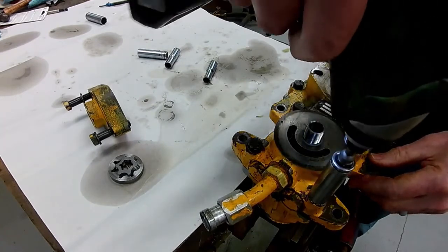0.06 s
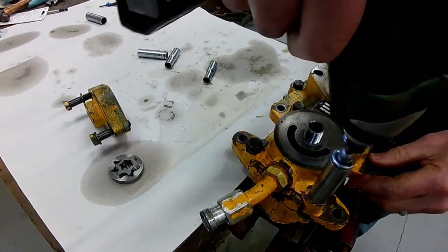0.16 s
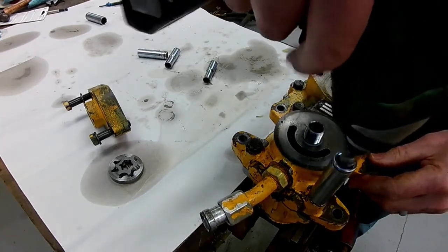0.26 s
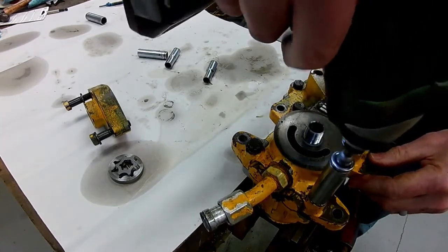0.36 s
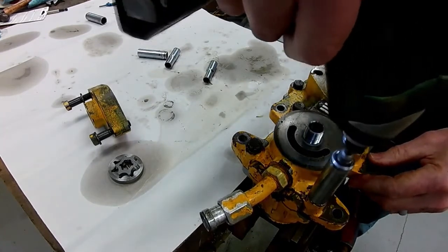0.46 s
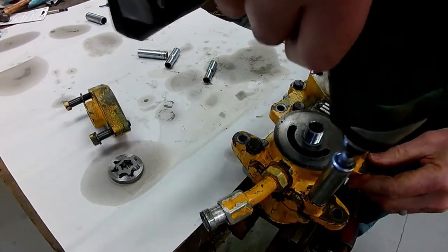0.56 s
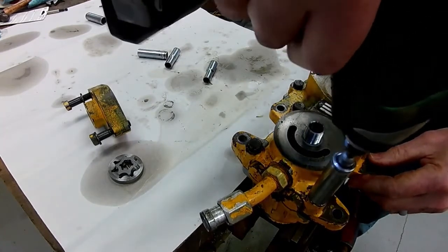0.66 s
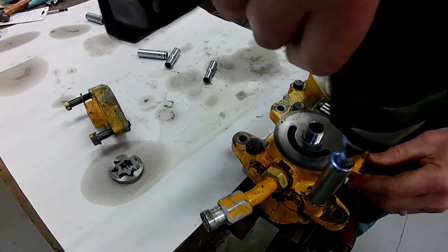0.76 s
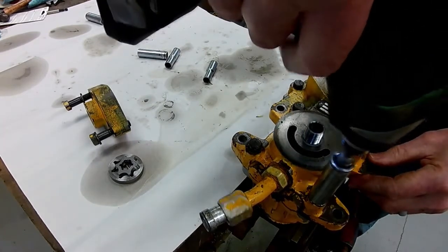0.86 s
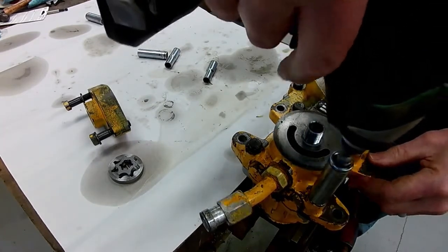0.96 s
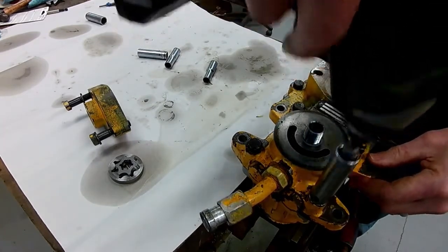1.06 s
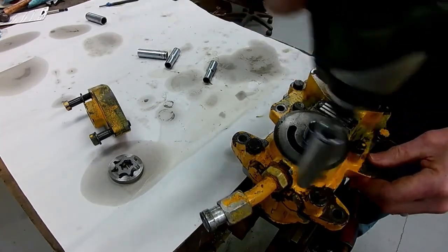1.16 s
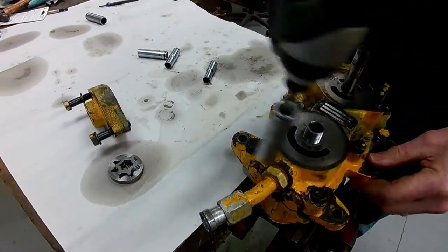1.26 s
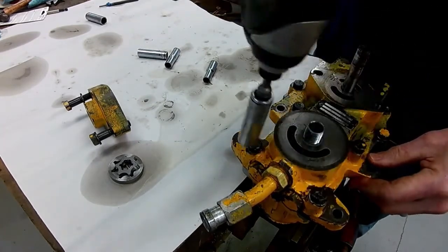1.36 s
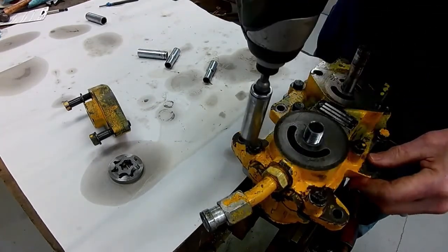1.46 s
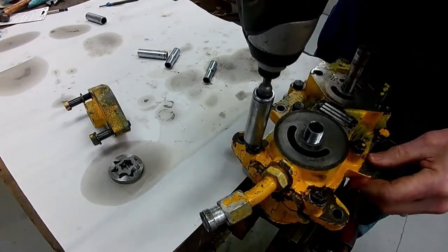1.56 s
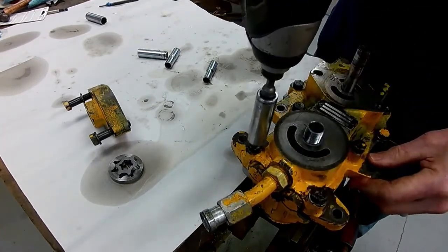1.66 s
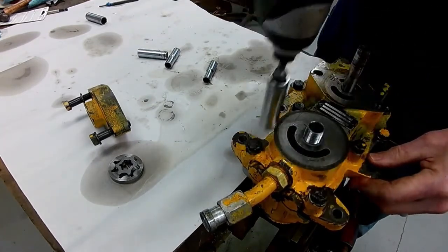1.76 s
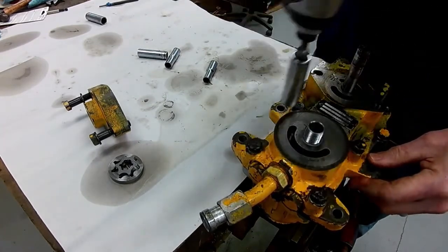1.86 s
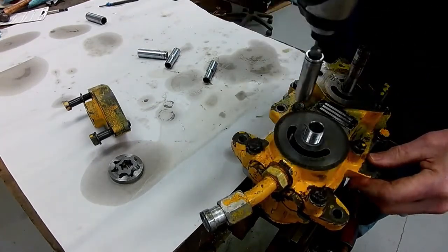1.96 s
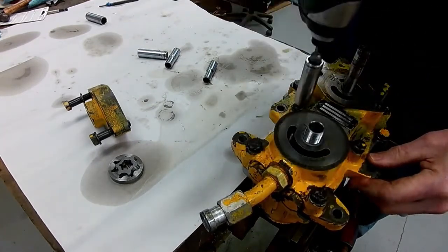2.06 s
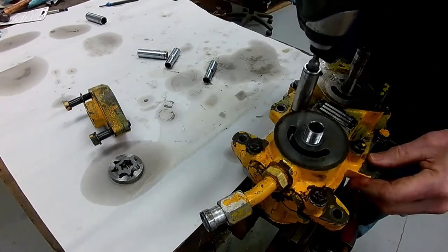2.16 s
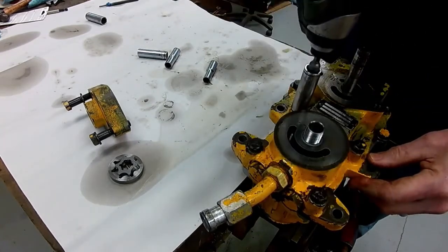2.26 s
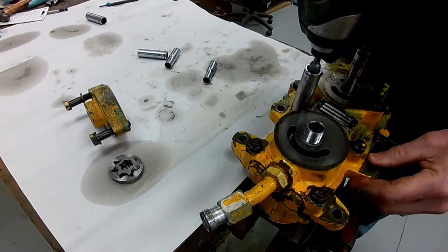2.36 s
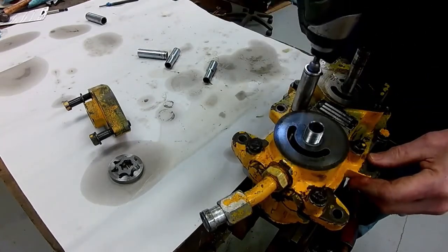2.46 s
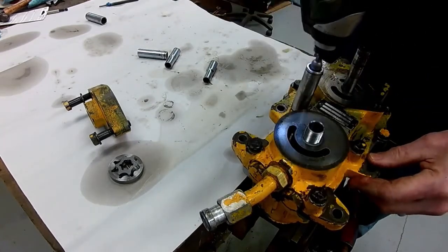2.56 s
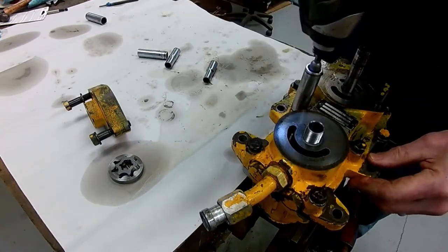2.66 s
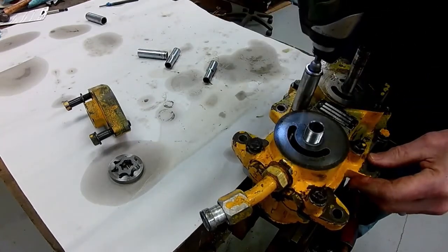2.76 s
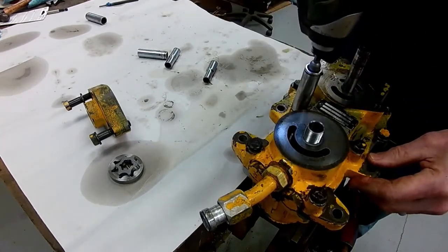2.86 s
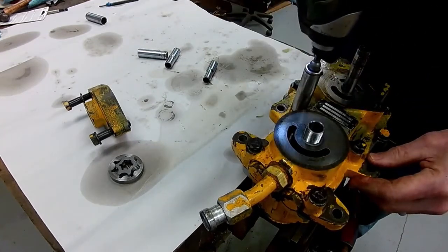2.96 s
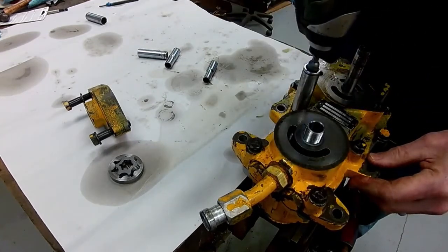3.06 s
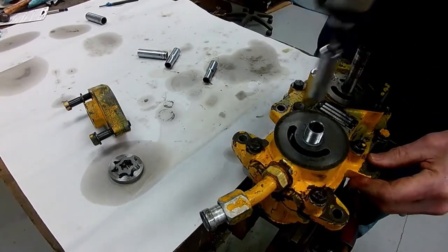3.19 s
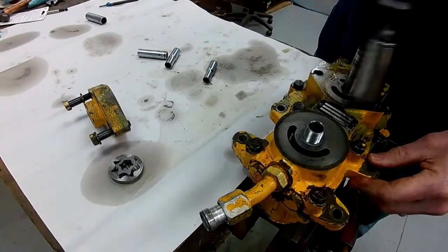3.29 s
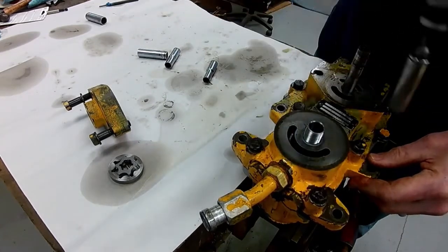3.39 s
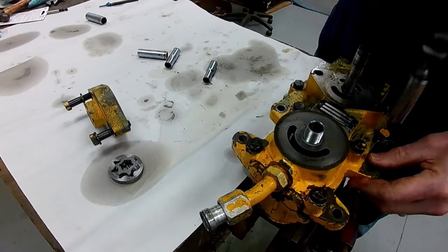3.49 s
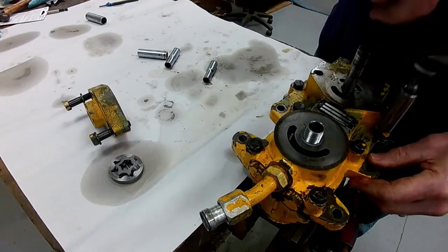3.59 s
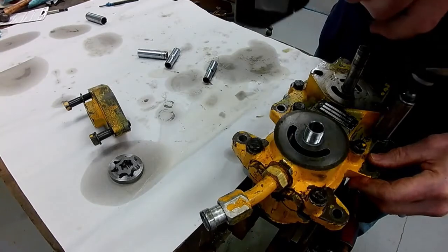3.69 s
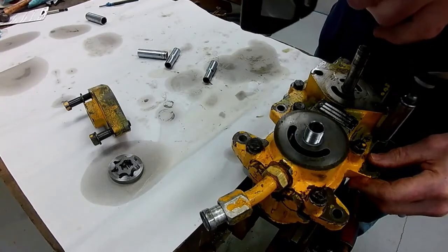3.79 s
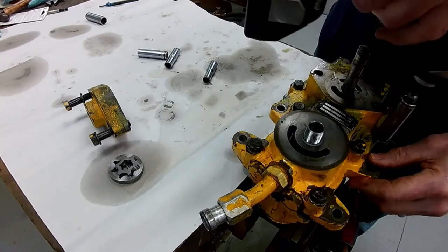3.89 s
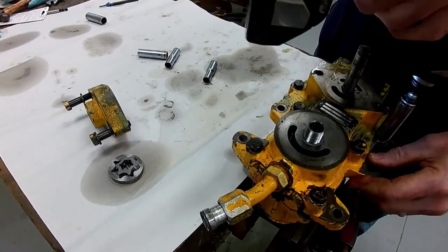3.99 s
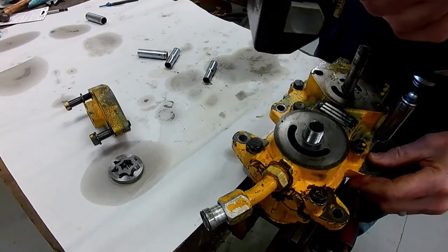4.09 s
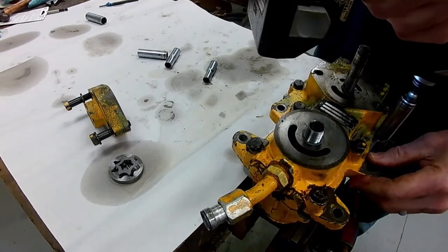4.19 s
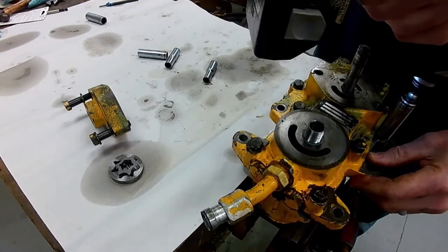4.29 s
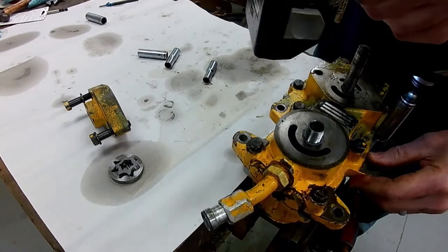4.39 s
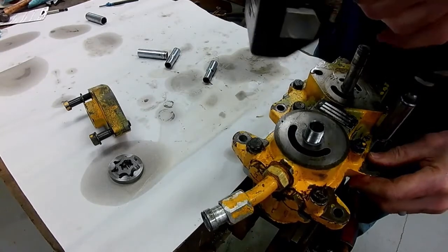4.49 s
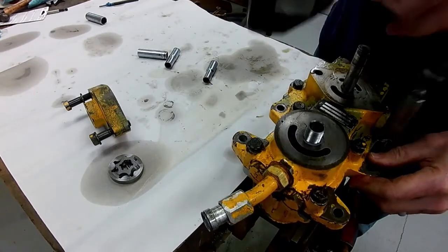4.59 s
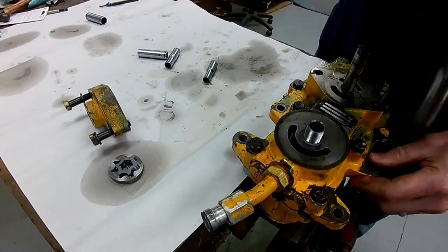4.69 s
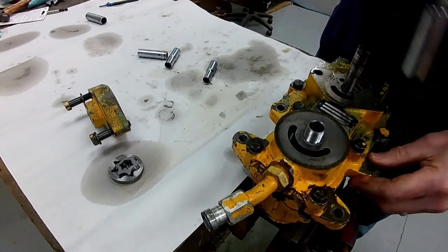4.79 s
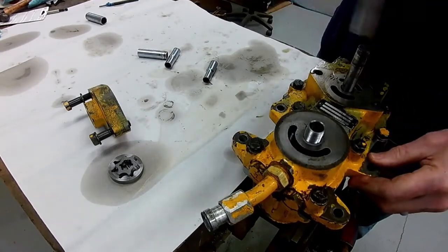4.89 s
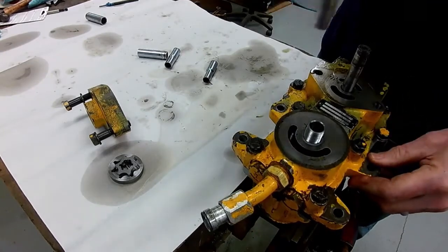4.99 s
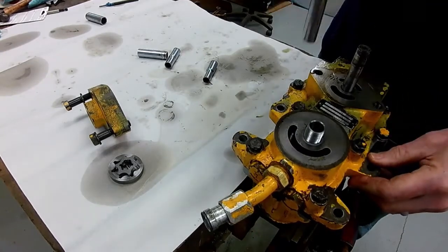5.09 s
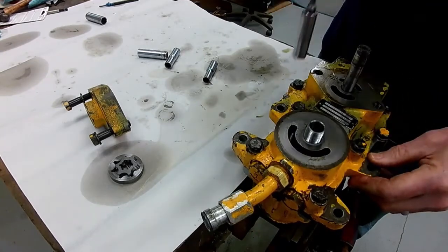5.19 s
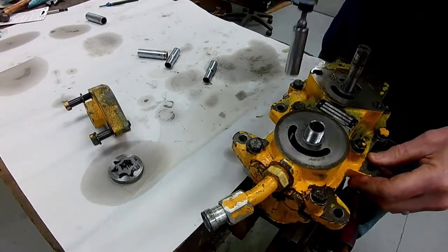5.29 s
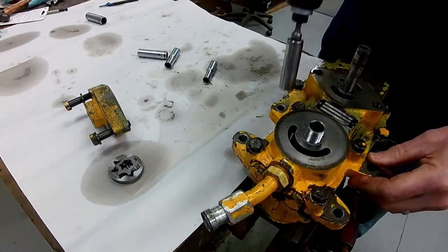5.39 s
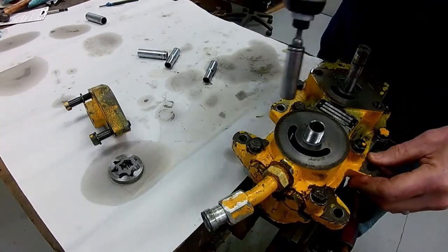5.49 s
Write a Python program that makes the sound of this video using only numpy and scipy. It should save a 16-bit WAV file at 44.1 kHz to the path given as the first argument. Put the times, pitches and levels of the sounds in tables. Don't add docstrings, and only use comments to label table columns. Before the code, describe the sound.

A cordless impact wrench hammers four harsh metallic bursts on a heavy casting, close and overloaded, with faint socket scrapes in between.

```python
import sys
import numpy as np
from scipy import signal
from scipy.fft import rfft, irfft, next_fast_len
from scipy.io import wavfile
from scipy.ndimage import uniform_filter1d

SR = 44100
rng = np.random.default_rng(int(sys.argv[2]) if len(sys.argv) > 2 else 0)


def decibels_to_gain(level_db):
    exponent = np.asarray(level_db, float) / 20
    return 10 ** exponent


def unload_wav(signal):
    wavfile.write(
        sys.argv[1],
        SR,
        np.round(np.clip(np.atleast_2d(signal).T, -1, 1) * 32767).astype(np.int16),
    )


N = 244314


def evened(x):
    return x / np.sqrt(np.mean(x ** 2) + 1e-20)


def read(points, hz):
    f, value = np.transpose(points)
    return np.interp(np.log(hz + 1), np.log(f + 1), value)


def colour(x, points):
    size = next_fast_len(len(x))
    gain = decibels_to_gain(read(points, np.fft.rfftfreq(size, 1 / SR)))
    return irfft(rfft(x, size) * gain, size)[:len(x)]


def resonate(x, hz, width):
    return signal.lfilter(*signal.iirpeak(hz, hz / width, SR), x)


def add(mix, s, sound):
    mix[round(s * SR):][:len(sound)] += sound


# frequency in Hz, density in dB per Hz.
AIR_COLOUR = [(12, -26), (20, -3), (65, 2), (86, -6), (163, -7), (300, -9.5), (341, -9), (441, -14),
              (541, -10), (615, -12), (1230, -14), (1840, -22), (9000, -55), (11700, -89.5), (19800, -120)]
# frequency in Hz, width in Hz, level in dB.
FAN = [(539.8, 43, -62.5), (153.9, 15, -64), (906.6, 37, -66)]


def air():
    wash_db = -52
    frames, hz = N // 256 + 5, np.fft.rfftfreq(1024, 1 / SR)
    a, b, patches = rng.standard_normal((frames, 513, 3)).T
    patches = uniform_filter1d(patches, 8, 0)
    patches = evened(uniform_filter1d(patches, 14, 1))
    z = (a + 1j * b) * decibels_to_gain(read(AIR_COLOUR, hz)[:, None] + 0.5 * patches)
    wash = decibels_to_gain(wash_db) * evened(signal.istft(z, nperseg=1024, noverlap=768)[1][:N])
    hiss = rng.standard_normal(N)
    tones = sum(decibels_to_gain(db) * evened(resonate(resonate(hiss, f, w), f, w)) for f, w, db in FAN)
    return wash + tones


# frequency in Hz, width in Hz, level in dB.
CASTING = [(800, 300, -8), (1050, 260, -2), (1500, 300, -4), (1900, 400, -10)]
# frequency in Hz, gain in dB.
CRACK = [(1500, -49), (2200, 8), (3300, 5), (4300, 3.5), (5500, -2.5), (6500, -19), (8000, -6)]


def strikes(rows, width_hz, skirt_hz, casting_db, crack_db, after_db, after_ms):
    thud_hz, thud_db = 328, -18
    out, t = np.zeros(N + 2048), np.arange(2048) / SR
    chance = rng.standard_normal((len(rows), 2048))
    crack_response = colour(np.eye(1, 128, 24)[0], CRACK)
    swell = 1 - np.exp(-t / 0.0004)
    for (s, db, rattle_ms, hz, share_db), noise in zip(rows, chance):
        chatter = noise * (1 + 6 * np.exp(-t / 0.00024))
        force = np.exp(-(1000 * t / rattle_ms) ** 4)
        shape = np.maximum(force, decibels_to_gain(after_db) * np.exp(-1000 * t / after_ms))

        casting = np.zeros(len(t))
        for k, (f, w, level_db) in enumerate(CASTING):
            casting += (-1) ** k * decibels_to_gain(level_db) * resonate(chatter, f, w)
        ring = resonate(chatter, hz, width_hz) + decibels_to_gain(casting_db) * casting
        ring = resonate(ring, hz, skirt_hz)
        ring /= np.sqrt(uniform_filter1d(ring ** 2, size=90) + 0.039 * np.mean(ring ** 2))

        thud = resonate(chatter * force, thud_hz, 660)
        crack = noise * abs(noise) * shape * np.exp(-t / 0.015)
        crack = signal.fftconvolve(crack, crack_response)[24:2072]
        for part, part_db in [(ring * shape * swell, 0), (thud, thud_db), (crack, share_db + crack_db)]:
            add(out, s, decibels_to_gain(db + part_db) * part / abs(part).max())
    return out[:N]


# first blow in seconds, last blow in seconds, gap in ms, ring in Hz, rattle in ms.
HAMMERING = [
    (0.0721, 0.107, 19.2, 1330, 3.1),
    (0.148, 0.2293, 20.4, 1294, 4.6),
    (0.4283, 0.5572, 21.3, 1174, 5.3),
    (0.579, .7798, 22.2, 1298, 8.5),
    (0.8, 0.8902, 21.7, 1323, 7.1),
    (2.5002, 2.6279, 21.9, 1177, 5.5),
    (2.651, 2.9863, 22.3, 1171, 5),
    (4.0182, 4.1088, 21.8, 1485, 4.1),
    (4.1277, 4.2355, 21.6, 1158, 3.4),
    (4.258, 4.4343, 22.2, 1492, 6.6),
]
# time in seconds, peak in dB, rattle in ms.
SLACK = [(0.5283, 2, 2), (0.5488, 9, 3.7), (0.5956, 11, 4.2), (0.6213, 11, 2.7), (0.6444, 6, 1.2),
         (0.6632, 6, 7), (0.684, 0.5, 2.2), (0.7075, 7.5, 6), (0.7442, 1.5, 5.8), (0.7525, 11, 3.8),
         (0.7952, 5.5, 2.6), (0.84, 11, 2.9), (0.8632, -3, 4), (2.6456, 3.5, 6.6), (2.6689, -2, 5.5),
         (2.7133, 3, 9.7), (2.7579, 4.5, 7.4), (2.802, 4, 9.8), (2.848, 7, 6.5), (2.8687, 6.5, 4.7),
         (2.9135, 9, 2.8), (2.9371, 4, 4.3), (2.9592, 5.5, 6), (2.9748, -6, 8.3), (2.9807, 6.5, 4.3),
         (4.2563, -0.5, 3), (4.3411, 2, 6), (4.428, 2, 4.7)]
# time in seconds, peak in dB, rattle in ms.
STUMBLES = [(0.0616, -7, 2.4), (0.1147, 3.5, 1.6), (0.1239, 10, 3.5), (0.2466, 5, 3.4), (0.2564, 1.5, 6.2),
            (0.4036, 3.5, 4.4), (0.4132, -3.5, 1.8), (.422, 1, 3.9), (0.4819, 1.5, 2.1), (2.465, -5, 1.4),
            (2.4706, 6.5, 2.3), (2.4789, 2.5, 2.5), (4.0121, 3, 1.0), (4.4586, -3.5, 13), (4.4777, 2, 3.5),
            (4.5129, -13.5, 3.6)]


def blows():
    blow_db = 6.5
    even = []
    for first, last, gap_ms, _, rattle_ms in HAMMERING:
        count = round(1000 * (last - first) / gap_ms) + 1
        even += [(s, blow_db, rattle_ms) for s in np.linspace(first, last, count)]

    late, weak = rng.standard_normal((len(even), 2)).T
    rebounds = []
    for (s, _, _), a, b in zip(even, late, weak):
        delay_ms, rebound_db, rebound_rattle_ms = 10.5 + 1.5 * a, -11 + 6.5 * b, 1.5
        rebounds.append((s + delay_ms / 1000, rebound_db, rebound_rattle_ms))

    s, db, rattle_ms = np.transpose(even + rebounds + SLACK + STUMBLES)
    a, b, c, d = np.clip(rng.standard_normal((len(s), 4)).T, -2, 2)
    starts, rings = np.transpose(HAMMERING)[[0, 3]]
    hz = np.interp(s, starts, rings) * np.exp(0.08 * c)
    glancing = np.repeat([0, 1, 0], [len(even), len(rebounds + SLACK), len(STUMBLES)])
    share_db = -10 + 1.54 * d - 3.5 * glancing
    return list(zip(s, db + 0.82 * a, rattle_ms * np.exp(0.2 * b), hz, share_db))


# time in
# seconds, peak in dB, rattle in ms, ring in Hz, crack share in dB.
TRIGGER = [
    (0.0139, -3.5, 2.1, 1307, -35.5),
    (0.0206, -19.5, 1.24, 1194, -27.5),
    (.073, 5, 6.2, 1393, -21.5),
    (0.902, -10, 2.5, 1148, -14),
    (3.009, -6.5, 1.5, 1334, -12),
    (3.023, -15, 1.7, 1305, -27),
    (3.039, -8, 1.5, 1190, -19.5),
    (4.495, 3.5, 0.87, 1354, -12),
    (4.529, -11, 2.1, 1300, -31),
]


def hammer():
    return strikes(blows() + TRIGGER, width_hz=480, skirt_hz=1080, casting_db=-29.5, crack_db=12.5,
                   after_db=-12.0, after_ms=11)


# pull, full speed, release and standstill in seconds, level in dB.
PULLS = [
    (0.045, 0.075, .26, 0.36, -19),
    (.36, .43, 0.9, 0.97, -16.5),
    (2.429, 2.452, 3.005, 3.274, -20.5),
    (3.962, 3.999, 4.53, 4.77, -22),
]
# time in seconds, level in dB.
SCRAPE = [
    [(2.085, -64), (2.1, -53), (2.14, -60.5), (2.165, -64), (2.185, -58), (2.21, -65.5)],
    [(3.655, -62), (3.68, -51.5), (3.7, -62.5), (3.76, -52.5), (3.79, -60), (3.81, -51.5), (3.84, -67)],
]
# frequency in Hz, density in dB per Hz.
WHIRR_COLOUR = [(24, -55.5), (40, -29), (193, -28.5), (263, -13.5), (336, -11), (611, -10.5), (996, 0.5),
                (1770, -11.5), (2310, -11.5), (5130, -21), (8000, -41), (10400, -80), (17600, -120)]


def whirr():
    load_db, still_db = 1.5, -58
    t, level = np.arange(N) / SR, np.zeros(N)
    for *s, db in PULLS:
        level += decibels_to_gain(np.interp(t, s, [still_db, db, db + load_db, still_db], -200, -200))
    for rows in SCRAPE:
        s, db = np.transpose(rows)
        level += decibels_to_gain(np.interp(t, s, db, -200, -200))
    strength = decibels_to_gain(1.5 * rng.exponential(1, N)) * rng.standard_normal(N)
    ticks = strength * (rng.random(N) < 6000 / SR)
    return level * evened(colour(ticks, WHIRR_COLOUR))


# time in seconds, peak in dB, ring in Hz, crack share in dB.
KNOCKS = [(1.0396, -16.5, 1290, -16), (2.088, -35, 1650, -17.5), (2.0974, -30, 1030, -26.5),
          (2.1032, -36.5, 1670, -9.5), (2.1097, -41.5, 990, -29.5), (2.1162, -32, 980, -30.5),
          (2.131, -29, 1510, -24.5), (2.1718, -28, 1010, -29), (2.1823, -36, 1090, -5.5),
          (2.4283, -32, 1090, -6.5), (2.4368, -27, 1240, -3), (3.665, -26.5, 1780, -29),
          (3.6724, -26, 1790, -6.5), (3.6877, -39.5, 1420, -14), (3.709, -35.5, 1410, -22),
          (3.7585, -34, 1030, -10), (3.777, -28.5, 1420, -25), (3.7971, -27.5, 1220, -24),
          (3.8014, -27.5, 1090, -7), (3.8094, -30.5, 880, -13), (3.9759, -24.5, 1410, -8)]
# time in seconds, peak in dB, rattle in ms, ring in Hz, crack share in dB.
THUMPS = [
    (5.5, -51.5, 12, 190, -47),
    (3.816, -45, 10, 200, -40.5),
    (4.1, -39, 10, 200, -45),
    (3.5, -47, 5.3, 240, -49),
]


def knocks():
    touches = [(s, db, 3.2, hz, share_db) for s, db, hz, share_db in KNOCKS]
    return strikes(touches + THUMPS, width_hz=280, skirt_hz=900, casting_db=-16, crack_db=9,
                   after_db=-1.5, after_ms=3.5)


# frequency in Hz, reverberation time in seconds.
SHOP = [(200, 0.3), (530, 0.69), (1390, .62), (3680, 0.69), (7000, 0.46)]
# delay in seconds, level in dB.
ECHOES = [(.004, -19), (.0075, -20), (.011, -16), (.016, -21), (.023, -22), (.031, -23)]


def shop(x):
    tail_db = -15.5
    taps = np.zeros(SR)
    at = np.arange(700, SR - 20, 20)
    taps[at + rng.integers(0, 20, len(at))] = rng.choice([-1., 1.], len(at))
    hz, t, z = signal.stft(taps, SR, nperseg=256)
    decay = decibels_to_gain(-60 * t / read(SHOP, hz)[:, None])
    tail = signal.istft(z * decay, SR, nperseg=256)[1]
    tail *= decibels_to_gain(tail_db) / np.linalg.norm(tail)
    for k, (s, db) in enumerate(ECHOES):
        tail[round(s * SR)] += (-1) ** k * decibels_to_gain(db)
    return signal.fftconvolve(x, tail)[:N]


def scene():
    tool = decibels_to_gain(-0.5) * hammer() + knocks() + whirr()
    return (tool + shop(tool) + air())[None]


# frequency in Hz, gain in dB.
MIC = [(20, -3), (100, 4.5), (500, 4), (4500, -3.5), (5800, -3), (6600, -6), (7500, -26), (9000, -64.5),
       (15000, -83.5)]


def microphone(x):
    knee, ceiling = 5.5, 0.88
    clipped = x / (1 + abs(x / ceiling) ** knee) ** (1 / knee)
    return colour(clipped, MIC)


# time in seconds, one band in Hz, other band in Hz,
# gain elsewhere in dB.
STARVED = [(.143, 4530, 2299, -12), (.305, 4316, 2695, -38), (.548, 3387, 2152, -8), (1.225, 3650, 4250, 0),
           (2.27, 3370, 2520, -14.5), (2.83, 2970, 4024, -8.5), (3.085, 2650, 2100, -9),
           (3.77, 5000, 2430, -16), (4.11, 3088, 6366, -6.5), (4.153, 2993, 2290, -15.5),
           (4.215, 5160, 3125, -0.5), (4.285, 5150, 3125, -10), (4.35, 5186, 2800, -9),
           (4.405, 4920, 3220, -6), (4.435, 2820, 3257, -12.5), (4.55, 3500, 2400, -22),
           (5.37, 2190, 1300, -21.5)]
# frequency in Hz, gain in dB.
SPECKS = [(5000, -45), (6200, 1), (7500, -2.5), (9000, -8.5), (12000, -12.5), (15500, -18), (15800, -60)]


def patchy_treble(x):
    kept_hz, kept_db = 199.6, 9.5
    specks_db, quiet_db = -32, -104
    hz, t, z = signal.stft(x, SR, nperseg=1024, noverlap=768)
    turn = np.exp(2j * np.pi * rng.random(z.shape[::-1]).T)
    held = np.repeat(turn[:, ::6], 6, 1)[:, :len(t)]
    steady = held * np.exp(2j * np.pi * hz[:, None] * t)

    for s, low_hz, high_hz, loss_db in STARVED:
        frames = abs(t - s) < 0.014
        kept = (abs(hz - low_hz) < kept_hz) | (abs(hz - high_hz) < kept_hz)
        gain = np.where(kept, decibels_to_gain(kept_db), decibels_to_gain(loss_db))
        smear = abs(z[:, frames]).mean(1, keepdims=True) * steady[:, frames] * gain[:, None]
        z[:, frames] = np.where(hz[:, None] > 1900, smear, z[:, frames])

    loudness = np.sqrt(uniform_filter1d((abs(z) ** 2).sum(0), size=6)) ** 1.69
    lines, bands = rng.random((len(t) // 6 + 1, len(hz), 2)).T
    survive = (lines < 0.27) & (bands[np.arange(len(hz)) // 4] < 0.78)
    survive = np.repeat(survive, 6, 1)[:, :len(t)]
    z += decibels_to_gain(specks_db - 2.5 + read(SPECKS, hz))[:, None] * loudness * survive * steady
    z *= (abs(z) > decibels_to_gain(quiet_db)) | (hz[:, None] < 4300)
    return signal.istft(z, SR, nperseg=1024, noverlap=768)[1][:N]


def low_pass(x):
    return signal.sosfilt(signal.butter(12, 15680, fs=SR, output="sos"), x)


def record(dry):
    hiss = decibels_to_gain(-90.5) * rng.standard_normal(N)
    mix = patchy_treble(microphone(dry[0])) + hiss
    return low_pass(np.clip(mix, -1, 1)[None])


dry = scene()
out = record(dry)
unload_wav(out)
```